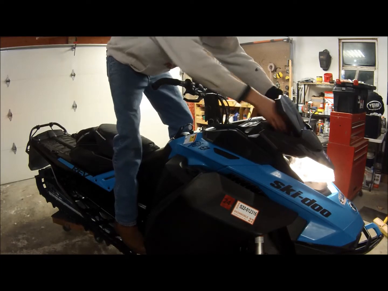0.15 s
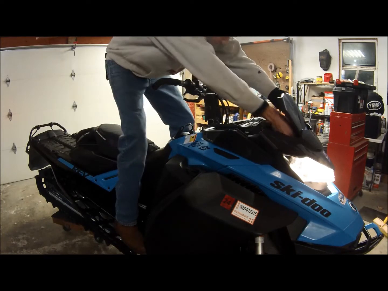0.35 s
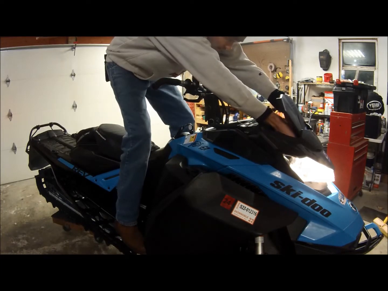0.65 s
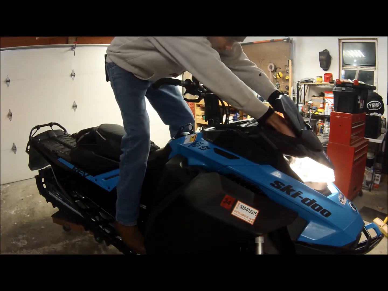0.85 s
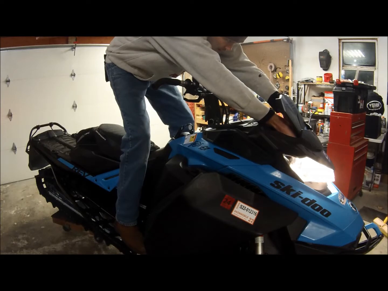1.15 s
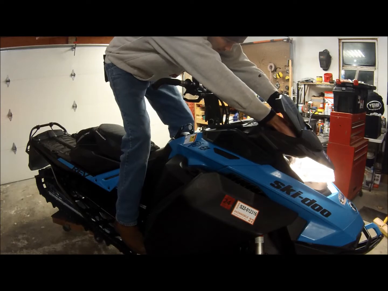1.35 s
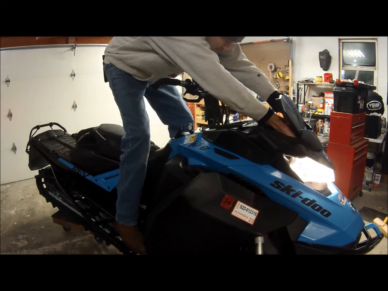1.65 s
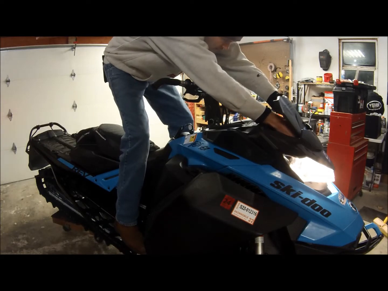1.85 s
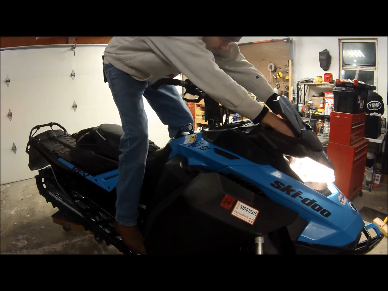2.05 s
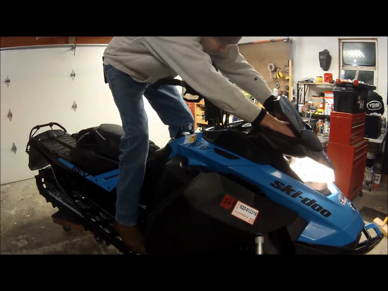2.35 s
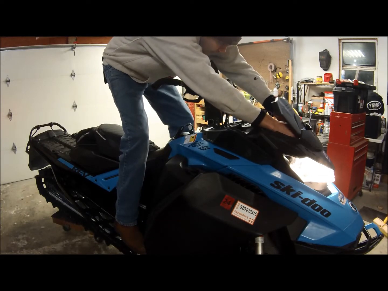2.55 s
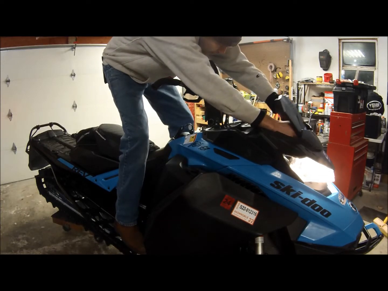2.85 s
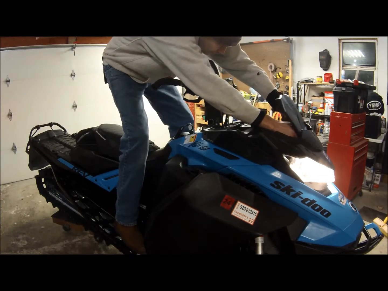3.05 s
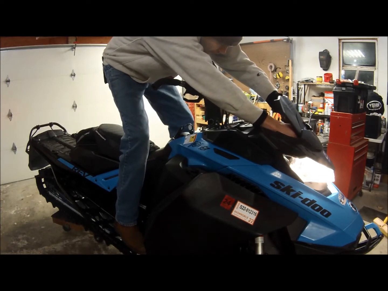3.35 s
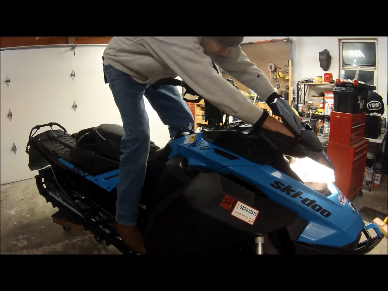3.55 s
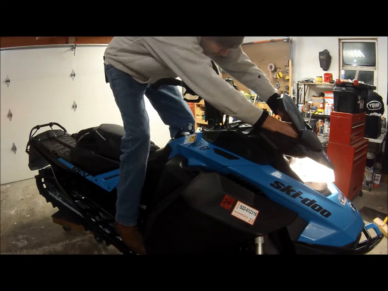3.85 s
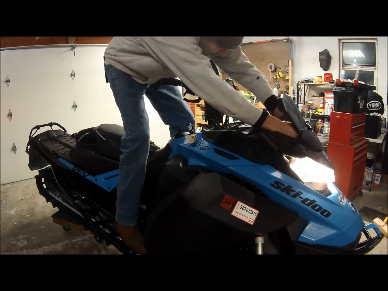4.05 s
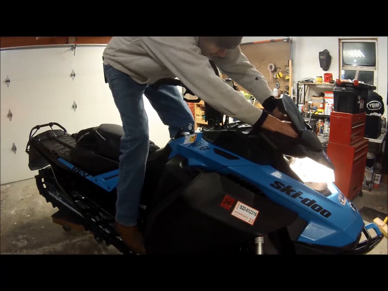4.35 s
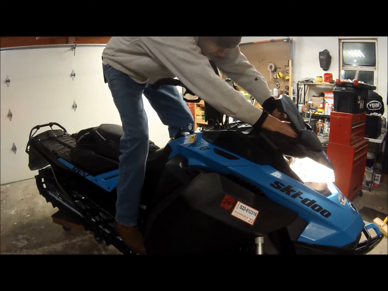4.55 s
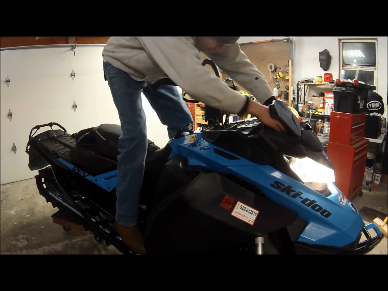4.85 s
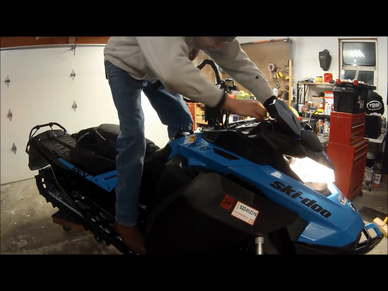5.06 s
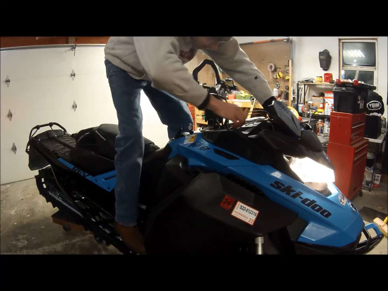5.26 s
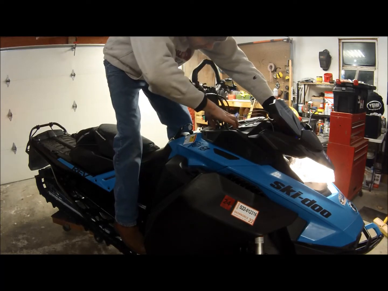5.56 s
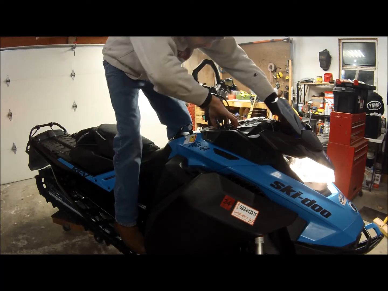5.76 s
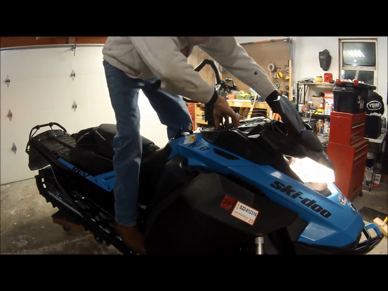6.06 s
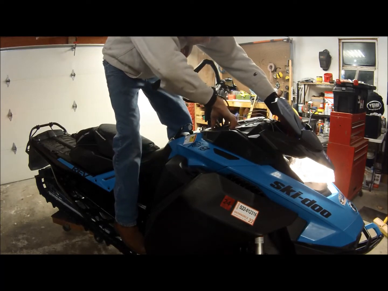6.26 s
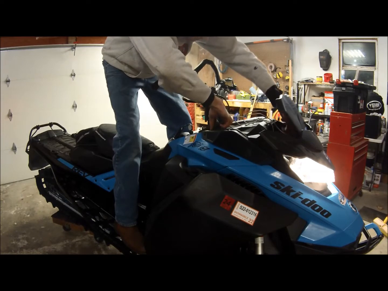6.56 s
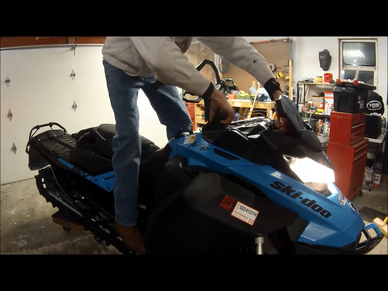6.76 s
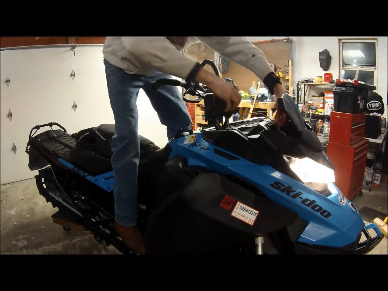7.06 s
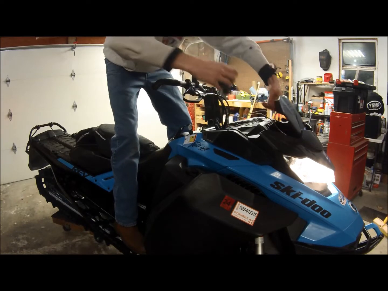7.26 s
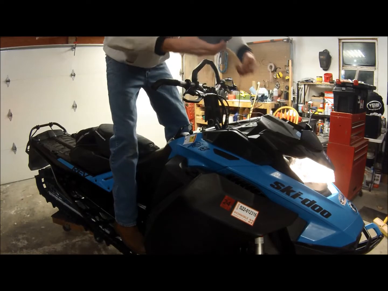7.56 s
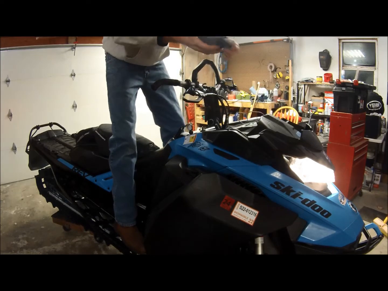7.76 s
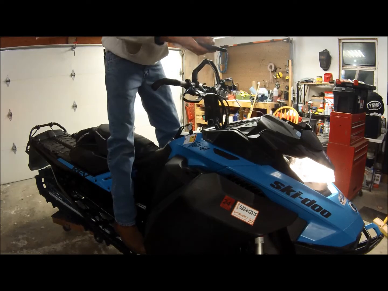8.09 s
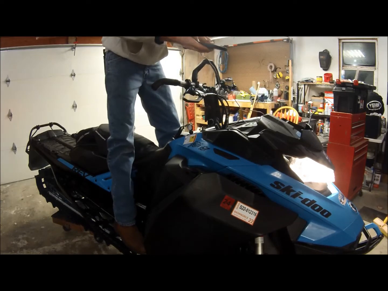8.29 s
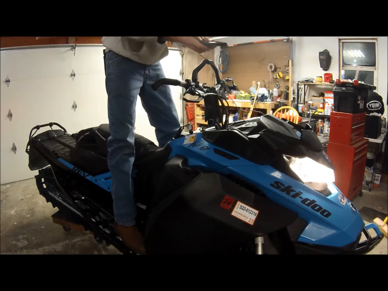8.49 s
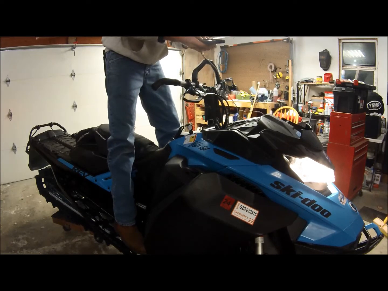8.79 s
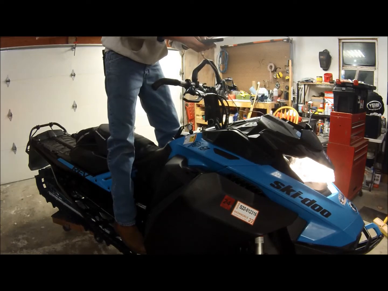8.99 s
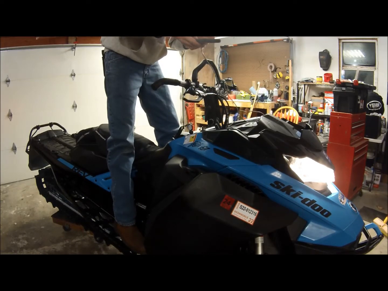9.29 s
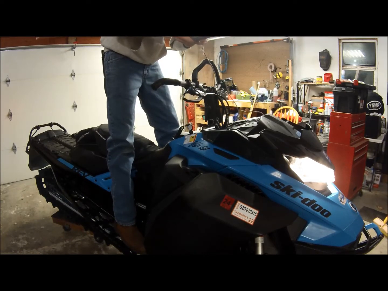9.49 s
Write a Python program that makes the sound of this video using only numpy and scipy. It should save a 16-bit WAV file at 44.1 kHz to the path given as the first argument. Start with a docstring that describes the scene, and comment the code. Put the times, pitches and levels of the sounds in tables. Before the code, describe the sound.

Inside a garage, a snowmobile engine putters at a slightly uneven idle, and a plastic lid clicks shut.

```python
"""In a closed garage, a twin-cylinder two-stroke snowmobile idles.
The exhaust throbs twice a crank turn; weak and strong firings drive the resonances of room, pipe
and silencer. Under the hood, pistons and clutch clatter and loose parts clink at set crank angles.
The rider handles a plastic lid on the dash and snaps it shut, and the bare walls reverberate."""
import sys
import numpy as np
from scipy import signal
from scipy.fft import rfft, irfft
from scipy.io import wavfile
from scipy.ndimage import uniform_filter1d

SR = 44100
rng = np.random.default_rng(int(sys.argv[2]) if len(sys.argv) > 2 else 0)


def pcm_store(signal):
    """Save signal as 16-bit PCM."""
    levels = np.round(np.clip(np.atleast_2d(signal), -1, 1) * 32767)
    wavfile.write(sys.argv[1], SR, levels.astype(np.int16).T)


N = 424683
T = np.arange(N) / SR


def undb(db):
    """Amplitude ratio: tenfold for every 20 dB."""
    return 10 ** (np.asarray(db) / 20)


def unit(x):
    """Normalisation to an rms of 1."""
    return x / np.sqrt(np.mean(x ** 2))


def steady(x, span_s=0.15):
    """Division by the running rms, which leaves only quick flutter in the level."""
    size = int(span_s * SR)
    return x / np.sqrt(uniform_filter1d(uniform_filter1d(x ** 2, size), size))


def curve(table):
    """Linear interpolation of (time, value) rows at every sample."""
    return np.interp(T, *np.transpose(table))


def surge(hz, width_hz):
    """Narrow-band noise: a slow random swing around a given rate, with an rms of 1."""
    f = np.fft.rfftfreq(N, 1 / SR)
    return unit(irfft(rfft(rng.standard_normal(N)) / (1 + ((f - hz) / width_hz) ** 2), N))


def lowpass(x, hz, order=2):
    """Low-pass filtering: the treble falls by 6 dB an octave for each order."""
    return signal.sosfilt(signal.butter(order, hz, fs=SR, output="sos"), x)


def through(x, response):
    """Circular convolution: the tail wraps round, so the room already rings at the start."""
    return irfft(rfft(x) * rfft(response, N), N)


def pulses(times, sizes):
    """An impulse train: one impulse of the given size at each time."""
    return np.bincount(np.clip(times * SR, 0, N).astype(int), sizes, N + 1)[:N]


def bursts(times, sizes, decay_s):
    """Exponential decay: a dying puff of noise at each time."""
    envelope = through(pulses(times, sizes), np.exp(-T[:SR // 4] / decay_s))
    return envelope * rng.standard_normal(N)


def ring(modes):
    """Modal superposition: an impulse response of damped cosines, the wider modes dying sooner."""
    t = T[:SR // 2]
    return sum(undb(db) * width * np.exp(-np.pi * width * t) * np.cos(2 * np.pi * hz * t)
               for hz, width, db in modes)


def colour(points, size=2048):
    """Minimum phase: the most compact causal impulse response with a given spectrum."""
    hz, db = np.transpose(points)
    f = np.maximum(np.fft.rfftfreq(size, 1 / SR), 1)
    bass_rolloff = np.minimum(f / hz[0], 1) ** 2
    gain = undb(np.interp(np.log(f), np.log(hz), db)) * bass_rolloff
    cepstrum = irfft(np.log(gain))
    cepstrum[1:size // 2] *= 2
    cepstrum[size // 2 + 1:] = 0
    return irfft(np.exp(rfft(cepstrum)))


def garage(x, wet_db, t60_s=0.55, treble_t60_s=0.2):
    """Reverberation: bare walls add a dense tail to the direct sound and absorb the treble first."""
    t = T[:SR // 2]
    reflections = rng.standard_normal(len(t)) * (1 - np.exp(-t / 0.0026))
    low = lowpass(reflections, 5500, order=1)
    treble = reflections - low
    tail = lowpass(low * undb(-60 * t / t60_s) + treble * undb(-60 * t / treble_t60_s), 11500)
    return x + undb(wet_db) * through(x, tail / np.linalg.norm(tail))


def firing_strengths(count, memory=0.68, period=3.61):
    """Feedback: a weak firing leaves fuel for the next, so strength swings every three or four firings."""
    feedback = [1, -2 * memory * np.cos(2 * np.pi / period), memory ** 2]
    swing = unit(signal.lfilter([1], feedback, rng.standard_normal(count)))
    # a charge can do no less than misfire and no more than burn fully
    return unit(np.tanh(2 * swing))


def throb(phase, swing, depth=0.032, lead_cycles=0.015):
    """Modulation of the periodic exhaust wave: strong firings come larger and earlier, misfires sag."""
    # Partials of the wave. Each row: multiple of the firing rate, relative level in dB.
    partials = [(.5, -30), (1, -2), (3, -13.5), (3.5, -27.5), (4, -20.5)]
    # Runs of weak firings. Each row: centre in seconds, sag in dB.
    misfires = [(.12, 2.5), (.66, 1.5), (1.55, -1), (2.43, 1.5), (2.88, 2), (3.21, 1), (4.27, 5), (4.85, 1),
                (5.7, 4), (6.04, 7), (6.36, 4), (6.82, 4), (7.17, 1), (7.96, 0), (9.26, 2)]
    angle = 2 * np.pi * (phase + lead_cycles * swing)
    pressure = sum(undb(db) * np.sin(k * angle) for k, db in partials)
    sag_db = sum(db * np.exp(-((T - s) / 0.043) ** 2) for s, db in misfires)
    return undb(-sag_db) * unit((1 + depth * swing) * pressure)


def boom(times, strength, gas_db=-2.5):
    """Room modes: the uneven part of each firing and its puff of gas shake the air in the garage."""
    # Low modes of the garage. Each row: frequency in Hz, bandwidth in Hz, relative gain in dB.
    room_modes = [(67.8, 25, 5), (86.6, 12, -2), (121.2, 9.1, 6), (143.2, 5.1, -9), (182.4, 20, -1),
                  (183, 7.6, -26)]
    gas = unit(bursts(times, np.ones(len(times)), decay_s=0.011))
    push = unit(pulses(times, strength)) + undb(gas_db) * gas
    pressure = through(push, ring(room_modes))
    pressure -= lowpass(pressure, 37, order=1)
    return steady(lowpass(pressure, 276, order=4))


def duct(times, strength, modes, gas_db, gas_s, scatter=0.13):
    """Forced resonance: each port opening sends a pulse and a longer rush of gas into a duct's modes."""
    pulse = unit(pulses(times, 1 + scatter * strength))
    gas = unit(bursts(times, np.ones(len(times)), gas_s))
    pressure = through(pulse + undb(gas_db) * gas, ring(modes))
    return steady(lowpass(pressure, 648, order=4))


def silencer(times, strength, rush_db, delay_s=0.0045):
    """Cavity resonance: the silencer drones, answering each firing a little after the pipe."""
    # Modes of the silencer. Each row: frequency in Hz, bandwidth in Hz, relative gain in dB.
    silencer_modes = [(261.1, 12.4, -2.5), (282.4, 4.7, -5.5)]
    # Course of the drone. Each row: time in seconds, relative level in dB.
    levels = [(0.0, -40), (0.18, -32.0), (0.57, -42.5), (0.69, -36), (0.87, -44), (1.14, -35.5),
              (1.74, -39.5), (1.89, -33), (2.01, -39.5), (2.46, -35.5), (2.79, -36), (2.97, -33.0),
              (3.12, -35.5), (3.24, -35.5), (3.45, -42), (3.54, -34), (3.96, -40.5), (4.47, -35.5),
              (5.61, -39), (6.09, -32.5), (6.18, -34), (6.57, -37.5), (6.84, -34), (7.26, -39),
              (7.53, -29.5), (7.62, -34), (8.43, -32), (8.7, -34.5), (9.3, -32), (9.63, -35)]
    drone = duct(times + delay_s, strength, silencer_modes, gas_db=rush_db - 5.5, gas_s=0.06)
    return undb(curve(levels) + 4.5) * drone


def pipe(times, strength, rush_db):
    """Standing waves: the exhaust pipe barks at its own resonances with each firing."""
    # Modes of the pipe. Each row: frequency in Hz, bandwidth in Hz, relative gain in dB.
    pipe_modes = [(337.4, 14, 2), (363.6, 16.4, 13.5), (384, 6.9, 3), (404, 2.2, 10), (454, 6.3, -33),
                  (520, 26, -14.5), (678, 11.7, 0.5), (764.6, 16, 2)]
    # Course of the bark. Each row: time in seconds, relative level in dB.
    levels = [(0.0, -30.5), (0.12, -29.5), (0.48, -30.5), (0.63, -30), (0.93, -32.0), (1.11, -28.5),
              (1.26, -31.5), (1.38, -28.0), (1.71, -33), (1.83, -29.5), (1.92, -32), (2.37, -29),
              (2.49, -32.5), (2.58, -28.5), (2.76, -32.5), (2.97, -30.5), (3.15, -34.5), (3.27, -27.5),
              (3.39, -35), (3.51, -31), (3.99, -31), (4.26, -32), (4.41, -28), (4.5, -32), (4.65, -30),
              (4.86, -33), (5.07, -29.5), (5.19, -30.5), (5.34, -29.5), (5.46, -33.5), (5.61, -28.5),
              (6.18, -31.0), (6.3, -29.0), (6.45, -30), (6.54, -28.5), (6.66, -31.5), (6.9, -30),
              (6.99, -32.0), (8.22, -32), (8.34, -30), (8.61, -31.5), (9.09, -30.5), (9.24, -28),
              (9.63, -30)]
    bark = duct(times, strength, pipe_modes, gas_db=rush_db - 3.3, gas_s=0.042)
    return undb(curve(levels) + 3.3) * bark


def clatter(phase, scatter_db=2.5):
    """Impact noise: pistons and clutch knock at set crank angles over the rush of intake and belt."""
    # Knocks in one crank turn. Each row: fraction of the turn, relative level in dB.
    impacts = [(0.099, 10.5), (0.309, 3.5), (0.545, 2), (.67, 8.5), (0.928, 5)]
    # Spectrum under the hood. Each row: frequency in Hz, relative spectral density in dB.
    hood_spectrum = [(400, -5), (580, -1), (820, -6), (930, -2.5), (1120, -4), (1400, -9.5), (1600, -7.5),
                     (1800, -8), (2050, -9.5), (3650, -12), (4600, -26), (6500, -22), (7400, -33),
                     (10700, -37), (11700, -43), (14500, -43.5)]
    turns = np.arange(int(phase[-1] / 2) + 1)
    knocks = 0
    for share, db in impacts:
        times = np.interp(turns + share, phase / 2, T, right=N)
        sizes = undb(db + scatter_db * rng.standard_normal(len(turns)))
        # each knock takes its own path through the garage
        knocks += garage(bursts(times, sizes, decay_s=0.0032), wet_db=3)
    rush = rng.standard_normal(N)
    return unit(through(unit(knocks) + rush, colour(hood_spectrum)))


def clinks(phase, scatter_db=1.5, slop_s=0.0006, width_hz=105):
    """Free vibration: each loose metal part is struck once a turn and rings briefly at its own pitch."""
    # Loose parts. Each row: fraction of the crank turn, frequency in Hz, relative level in dB.
    parts = [(.11, 1760, -0.5), (0.149, 1090, 0), (.35, 1820, -0.5), (0.552, 965, 1.5), (0.802, 1118, 3.5)]
    turns = np.arange(int(phase[-1] / 2))
    ringing = 0
    for share, hz, db in parts:
        lateness, hardness = rng.standard_normal((2, len(turns)))
        times = np.interp(turns + share, phase / 2, T) + slop_s * lateness
        strikes = pulses(times, undb(db + scatter_db * hardness))
        ringing += through(strikes, ring([(hz, width_hz, 0)]))
    return unit(garage(lowpass(ringing, 2400, order=4), wet_db=-4))


def lid():
    """Impulse excitation: each tap is a crack and a brief scrape, coloured by the plastic lid."""
    # Light ticks, then the snap of the latch. Each row: start in seconds, relative level in dB.
    taps = [(1.182, -46), (1.56, -43), (2.92, -44), (6.406, -47), (6.933, -46), (7.4715, -21),
            (7.474, -25.5), (7.4775, -27), (7.4805, -31), (7.487, -32)]
    # Spectrum of the lid. Each row: frequency in Hz, relative spectral density in dB.
    lid_spectrum = [(400, -10), (1800, 0), (2700, 1.5), (3600, 2), (4100, -3), (4500, -16), (5200, -14),
                    (5700, -4), (6200, -4), (7000, -11.5), (8200, -11), (11000, -14.5), (12200, -17),
                    (13500, -12), (14700, -12.5), (15400, -30)]
    times, db = np.transpose(taps)
    cracks = pulses(times, undb(db + 9.5))
    scrapes = bursts(times, undb(db - 6), decay_s=0.0015)
    body = colour(lid_spectrum)
    return garage(through(cracks + scrapes, body / np.linalg.norm(body)), wet_db=-2)


def scene():
    """Superposition: one crankshaft times both exhaust and machinery, and the lid sounds over them."""
    # The idle hunts about its set speed. Each row: time in seconds, firing rate in Hz.
    firing_rates = [(0.0, 49.83), (0.12, 51.82), (0.24, 48.62), (0.3, 49.31), (0.36, 47.62), (0.67, 50.02),
                    (0.81, 47.32), (1.07, 50.28), (1.14, 48.88), (1.44, 50.91), (1.6, 48.57), (1.94, 48.56),
                    (2.38, 51.4), (2.71, 48.02), (2.82, 49.67), (3.0, 45.47), (3.18, 49.43), (3.56, 50.43),
                    (3.75, 45.75), (3.87, 47.29), (4.0, 47.62), (4.23, 48.84), (4.37, 50.43), (4.63, 50.46),
                    (4.93, 49.67), (5.09, 47.26), (5.32, 49.99), (5.52, 48.84), (5.93, 52.51),
                    (6.17, 49.07), (6.36, 51.5), (6.51, 47.77), (6.74, 50.43), (6.87, 47.84), (7.11, 48.45),
                    (7.26, 47.21), (7.55, 49.11), (7.62, 47.68), (7.94, 50), (8.28, 49.67), (8.4, 51.08),
                    (8.53, 48.24), (8.7, 48.32), (8.85, 49.84), (9.05, 48.78), (9.27, 51.45), (9.4, 49.37),
                    (9.63, 49.74)]
    # Unevenness of the firings. Each row: time in seconds, relative level in dB.
    unevenness = [(0.0, -34), (0.12, -28), (0.3, -38), (0.39, -30.5), (0.75, -36), (1.26, -30), (1.41, -38),
                  (1.56, -27), (1.86, -39), (2.46, -27.5), (2.61, -36.5), (2.97, -29.5), (3.09, -37.5),
                  (3.3, -30), (3.42, -37), (3.6, -40), (3.69, -31), (3.96, -37.0), (4.23, -29.5),
                  (4.38, -33.5), (4.53, -28), (4.65, -34.5), (4.83, -28), (4.95, -39), (5.1, -29),
                  (5.19, -40), (5.43, -26), (5.55, -40.5), (5.7, -27.5), (6.33, -30), (6.48, -35),
                  (6.6, -30), (6.81, -31), (6.9, -41), (7.26, -30), (7.53, -38), (7.68, -30), (7.83, -44),
                  (7.98, -29), (8.1, -35.5), (8.34, -29.5), (8.7, -38.5), (8.91, -31.5), (9.18, -38),
                  (9.3, -29.5), (9.63, -36)]
    # Moments when the loose parts rattle harder. Each row: centre in seconds, rise in dB.
    rattles = [(.78, 4), (1.5, 1), (2.11, 3.5), (2.49, 2.5), (2.92, 3.5), (3.26, 2), (3.6, 1), (5.08, 4),
               (6.87, 5), (7.92, 2.5), (9.57, 2.5)]
    firing_hz = curve(firing_rates)
    wobble_s = 0.00015 * surge(hz=4, width_hz=5)  # the crank runs a little ahead and behind
    phase = np.cumsum(firing_hz) / SR + firing_hz * wobble_s  # counts firings, two to a turn
    times = np.interp(np.arange(int(phase[-1]) + 1), phase, T)
    strength = firing_strengths(len(times))
    times += 0.00013 * rng.standard_normal(len(times))  # combustion never takes quite the same time

    # rougher running than usual weakens the throb and buries the pulses in the rush of gas
    uneven_db = curve(unevenness)
    rough_db = uneven_db + 33
    throb_db, rush_db = -18.5 - 0.23 * rough_db, 0.45 * rough_db
    exhaust = undb(throb_db) * throb(phase, np.interp(T, times, strength))
    exhaust += undb(uneven_db + 4) * boom(times, strength)
    exhaust += silencer(times, strength, rush_db) + pipe(times, strength, rush_db)
    # destructive interference: a notch stands for the band that the floor echo cancels
    hollow_hz, hollow_width_hz = 217, 10.6
    exhaust = signal.lfilter(*signal.iirnotch(hollow_hz, hollow_hz / hollow_width_hz, fs=SR), exhaust)

    rattle_db = sum(db * np.exp(-((T - s) / 0.044) ** 2) for s, db in rattles)
    clatter_db = -32.5 + 0.4 * surge(hz=2.9, width_hz=4.3) + 0.35 * rattle_db
    machinery = undb(clatter_db) * clatter(phase) + undb(rattle_db - 36.8) * clinks(phase)
    return (undb(-3) * (exhaust + machinery) + lid())[None]


def record(dry):
    """Band limiting: the deepest bass and the top of the treble are cut."""
    bass_cut = signal.butter(3, 20, "highpass", fs=SR, output="sos")
    treble_cut = signal.ellip(10, .2, 80, 15250, fs=SR, output="sos")
    return signal.sosfilt(treble_cut, signal.sosfiltfilt(bass_cut, dry, padtype="even"))


dry = scene()
out = record(dry)
pcm_store(out)
```